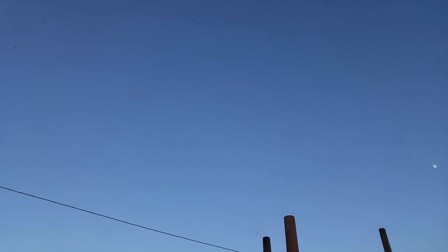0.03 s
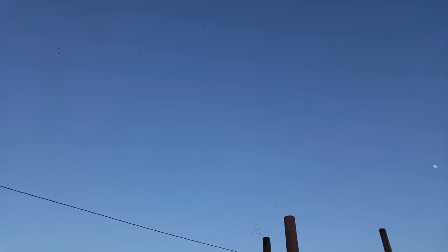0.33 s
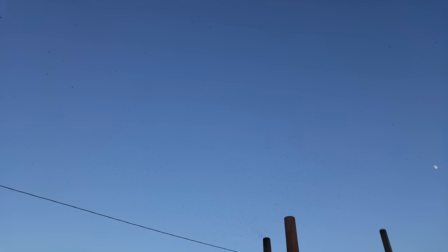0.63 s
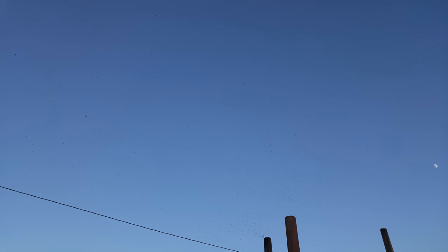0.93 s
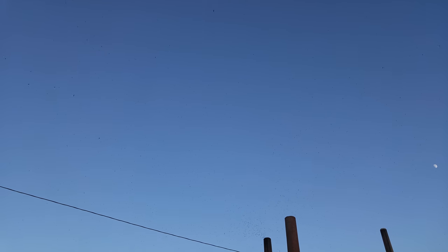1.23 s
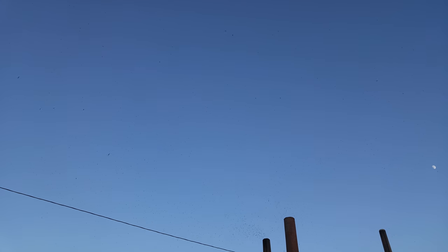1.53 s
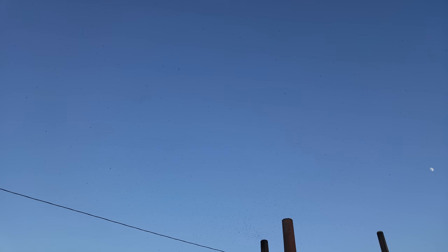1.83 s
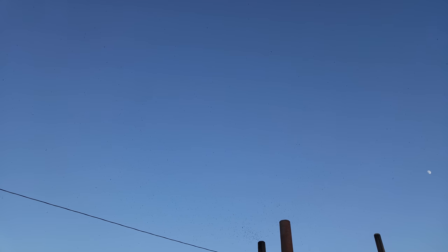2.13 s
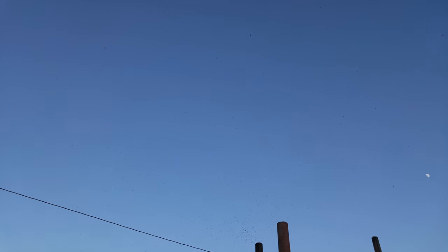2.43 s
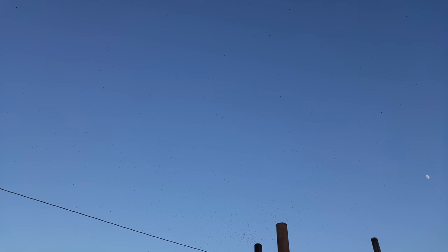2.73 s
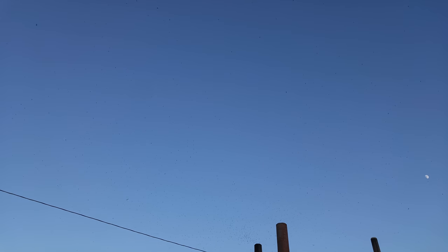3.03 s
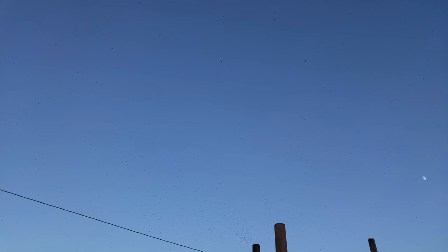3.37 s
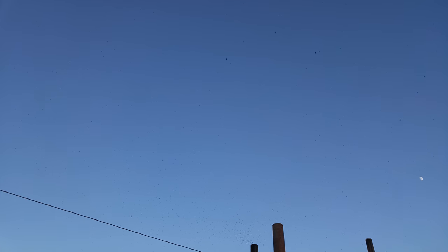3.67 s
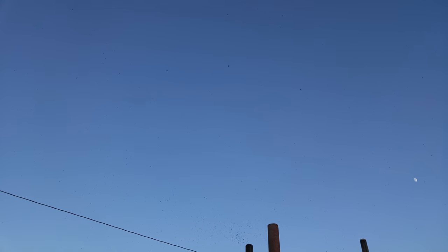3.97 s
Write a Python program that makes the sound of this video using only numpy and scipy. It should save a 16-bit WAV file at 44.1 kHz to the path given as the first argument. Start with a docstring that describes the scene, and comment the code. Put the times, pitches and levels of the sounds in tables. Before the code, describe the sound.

Swifts twitter faintly high overhead throughout the four seconds, with quick falling chirps, short peeps and thin trilled screams around 0.4, 2 and 2.5 seconds. Louder wind buffets the microphone, in long gusts on the left and short puffs on the right, popping at about 2.6 and 3.6 seconds. A far town hum and a faint electric buzz lie behind, dipping with the birds after the last pop.

```python
"""Swifts twitter high overhead: quick falling chirps, short peeps and a few arched, trilled screams,
each a gliding whistle thrown back by a wall and the roofs. Wind buffets the two microphone ports
separately, in long gusts on the left and short puffs on the right, and now and then makes a port pop.
A hand faintly brushes the camera. Behind it all lie the blur of the farthest birds, a far town hum
and a faint, dry electric buzz."""
import sys
import numpy as np
from scipy import signal
from scipy.fft import rfft, irfft, next_fast_len
from scipy.io import wavfile
from scipy.ndimage import uniform_filter1d, minimum_filter1d, map_coordinates

SR = 44100
rng = np.random.default_rng(int(sys.argv[2]) if len(sys.argv) > 2 else 0)


def dump(signal):
    """Clip the signal to [-1, 1] and save it as 16-bit WAV at the path in sys.argv[1]."""
    limited = np.clip(np.atleast_2d(signal).T, -1, 1)
    pcm = np.round(limited * 32767).astype(np.int16)
    wavfile.write(sys.argv[1], SR, pcm)


N = 176400
TIME = np.arange(N) / SR

TRILL_HZ, TRILL_FALL_HZ, ROUGH_HZ, TRILL_ROUGH_HZ = 62.7, 800, 111, 207
def whistle(length, start_hz, middle_hz, end_hz, trill=False):
    """One bird note swells and fades along a bowed glide; a trill chops it into falling pulses."""
    n = max(int(length * SR), SR // 200)
    u = np.linspace(0, 1, n)
    pulse = (TRILL_HZ * np.arange(n) / SR + 0.18 * wobble(22, n)) % 1
    bow = (2 * middle_hz - start_hz - end_hz) * 2 * u * (1 - u)
    hz = start_hz + (end_hz - start_hz) * u + bow
    hz += (TRILL_ROUGH_HZ if trill else ROUGH_HZ) * wobble(900, n)
    swell = np.abs(np.sin(np.pi * u ** 0.78))  # peaks a little early
    if trill:
        hz += TRILL_FALL_HZ * (.5 - pulse)
        swell = np.sqrt(swell) * np.sin(np.pi * pulse) ** 2
    flicker = amp(0.97 * wobble(250, n))
    return unit(swell * flicker * np.sin(2 * np.pi * np.cumsum(hz) / SR))


def chirp(length, start_hz, fall_hz):
    """A plain falling stroke; no two fall or sag quite alike."""
    depth, sag = rng.standard_normal(2)
    fall_hz = fall_hz * (1 + 0.158 * depth)
    sag_hz = 69.3 * (1 + 2 * sag)
    return whistle(length, start_hz, start_hz - fall_hz / 2 - sag_hz, start_hz - fall_hz)


CHIRP_TRIM_DB, CHIRP_FALL_HZ, PEEP_ARCH_HZ = -3, 2193, 350
# falling chirps: t/s, length/s, start f/Hz, level/dB before the trim
CHIRP_CUES = [(.008,.03,8860,-46.5), (0.037,0.042,8670,-51), (.07,.03,7620,-44.5), (0.095,0.035,7950,-44),
              (0.206,0.044,8500,-41.5), (0.241,0.032,8100,-45.5), (0.351,0.016,9000,-48),
              (.488,0.021,8370,-40), (0.559,0.042,8200,-42), (0.694,0.047,8560,-40.5),
              (0.782,0.034,7960,-45), (0.839,0.016,9400,-39.5), (0.857,.02,8070,-44.5),
              (.913,0.021,9120,-42), (.915,0.016,8320,-40), (0.971,0.017,8100,-39), (1.07,0.017,9080,-39.5),
              (1.084,.03,8250,-44), (1.257,0.015,9170,-39.5), (1.36,.035,8030,-49), (1.38,0.015,9030,-44.5),
              (1.497,0.023,9200,-41.5), (1.507,0.013,9200,-39), (1.594,0.013,8900,-41),
              (1.642,.018,8400,-46), (1.664,0.02,9270,-42), (1.757,.018,9600,-47), (1.779,.022,8440,-41),
              (1.786,0.022,9200,-41.5), (1.806,0.033,8760,-48), (1.825,0.016,7570,-45),
              (1.843,.018,9400,-42), (1.898,.022,7900,-41.5), (1.94,0.031,8600,-45.5),
              (2.032,.014,8700,-43), (2.051,0.027,8200,-36.5), (2.161,0.02,8240,-39),
              (2.272,0.041,8100,-34.5), (2.367,0.02,9000,-40), (2.744,0.015,8760,-38.5),
              (2.802,0.058,8000,-45), (3,.04,8170,-45.5), (3.143,.03,8000,-47), (3.187,0.017,9100,-39),
              (3.266,0.018,9100,-39.5), (3.315,0.036,9300,-45), (3.335,.04,7700,-45),
              (3.386,0.015,9100,-48), (3.416,0.024,9000,-45), (3.469,.022,8820,-43), (3.544,0.044,8220,-46),
              (3.812,0.026,8530,-41), (3.937,0.025,8570,-44)]
# arched peeps: t/s, length/s, top f/Hz, level/dB
PEEP_CUES = [(.715,0.017,8300,-41), (.73,0.05,7450,-41), (0.816,0.016,7490,-41), (1.144,0.018,7100,-40),
             (2.979,0.027,8150,-43.5)]
# trilled screams: t/s, length/s, start f/Hz, middle f/Hz, end f/Hz, level/dB
SCREAM_CUES = [(.385, 0.18, 6500, 6600, 7080, -48), (0.489, 0.12, 7750, 8300, 8130, -50.5),
               (1.959, 0.23, 5590, 6520, 6900, -56), (2.089, .16, 6880, 7130, 6160, -50),
               (2.455, 0.22, 5800, 6960, 6250, -44)]
def near_calls():
    """The nearer birds' dry whistles, as (time, level, note)."""
    for s, length, hz, db in CHIRP_CUES:
        yield s, db + CHIRP_TRIM_DB, chirp(length, hz, CHIRP_FALL_HZ)
    for s, length, hz, db in PEEP_CUES:
        yield s, db, whistle(length, hz - PEEP_ARCH_HZ, hz, hz - PEEP_ARCH_HZ)
    for s, length, start, middle, end, db in SCREAM_CUES:
        yield s, db, whistle(length, start, middle, end, trill=True)


FAR_TRILLS_PER_S, FAR_TRILL_DB, FAR_CHIRPS_PER_S, FAR_CHIRP_DB = 4, -56.5, 105, -55
def far_calls():
    """A random scatter of faint, low trills and tiny chirps far off, as (time, level, note)."""
    for s in rng.uniform(0, N / SR, int(FAR_TRILLS_PER_S * N / SR)):
        glide_hz = 6080 * np.exp(0.029 * rng.standard_normal(3))
        yield s, FAR_TRILL_DB, whistle(0.046, *glide_hz, trill=True)
    for _ in range(int(FAR_CHIRPS_PER_S * N / SR)):
        length = 0.02 * np.exp(.3 * rng.standard_normal())
        hz = 7560 + 1200 * rng.uniform(-1, 1)
        fall_hz = min(CHIRP_FALL_HZ, hz - 5647)  # low chirps have less room to fall
        yield rng.uniform(0, N / SR), FAR_CHIRP_DB, chirp(length, hz, fall_hz)


BIRD_PAN_DB, PAN_SPREAD_DB, ARRIVAL_SPREAD_S = -3.5, 4.5, .00004
WALL_DELAY_S, WALL_DB, ECHO_DB, ECHO_T60_S = .0065, -6, -8, 0.12
def swifts():
    """Each call comes from its own direction, doubled by a wall and echoed by the roofs."""
    out = np.zeros((2, N))
    t = TIME[:SR // 3]
    tail = rng.standard_normal((2, len(t))) * amp(-60 * t / ECHO_T60_S)
    for s, db, note in [*near_calls(), *far_calls()]:
        pan, lag, path = rng.standard_normal(3)
        pan_db = BIRD_PAN_DB + PAN_SPREAD_DB * pan
        for delay, loss_db in ((0, 0), (WALL_DELAY_S * np.exp(.3 * path), WALL_DB)):
            add(out, s + delay, amp(db + loss_db) * note, pan_db, ARRIVAL_SPREAD_S * lag)
    echo = signal.fftconvolve(out, tail / np.linalg.norm(tail[0]), axes=1)[:, :N]
    return out + amp(ECHO_DB) * echo


PUFF_EDGE_S = 0.0042
# gusts on the left port: t/s, level/dB
LEFT_GUSTS = [(0, -23.5), (.05, -30), (.19, -22.5), (.39, -13.5), (.635, -25), (.66, -11), (.73, -14),
              (.77, -17), (1.03, -20), (1.07, -13.5), (1.16, -20.5), (1.32, -29), (1.4, -11), (1.56, -31),
              (1.63, -21), (1.94, -14.5), (2.07, -35.5), (2.2, -51), (2.39, -20.5), (2.44, -48),
              (2.55, -24), (2.63, -21), (2.71, -40.5), (2.91, -29), (3.02, -12.5), (3.12, -16),
              (3.38, -14.5), (3.49, -16.5), (3.53, -22.5), (3.6, -18), (3.62, -13), (3.85, -15.5), (4, -16)]
# breeze on the right port between puffs: t/s, level/dB
RIGHT_BREEZE = [(0, -22.5), (.33, -27.5), (.5, -34), (.75, -28), (.87, -25), (1.15, -19), (1.68, -32.5),
                (2.0, -26.5), (2.5, -27), (2.78, -35), (2.97, -22.5), (3.4, -22.5), (3.65, -25.5),
                (4, -28.5)]
# puffs on the right port: middle t/s, length/s, level/dB
RIGHT_PUFFS = [(0.039, 0.021, -15), (0.092, 0.031, -14.5), (0.9, 0.032, -17.5), (1.14, 0.072, -17.5),
               (1.228, 0.028, -14), (1.46, 0.062, -19.5), (1.51, 0.029, -16), (2.046, 0.03, -10),
               (2.142, 0.03, -10.3), (2.236, .04, -16), (2.272, 0.023, -14), (2.405, 0.028, -14),
               (2.579, 0.04, -16.5), (2.627, 0.034, -12.5), (2.674, 0.057, -12), (2.905, 0.037, -12.5),
               (3.231, 0.022, -14), (3.3, 0.018, -14.5), (3.364, 0.042, -16)]
def wind_force():
    """How hard the air hits each port, in dB: long gusts left, soft-edged puffs over a breeze right."""
    right = amp(curve(RIGHT_BREEZE))
    for s, length, db in RIGHT_PUFFS:
        gate = (1 + np.tanh((length / 2 - np.abs(TIME - s)) / PUFF_EDGE_S)) / 2
        right = np.maximum(right, amp(db) * gate)
    return np.array([curve(LEFT_GUSTS), 20 * np.log10(right)])


REFERENCE_DB, FLUTTER_DB, FLUTTER_PER_S = -16.5, 3, 190
# deep rumble of slow eddies: f/Hz, level/dB
RUMBLE_EQ = [(20, -45), (32, -31), (50, 5.5), (72, 10), (110, 6), (180, -4.5), (300, -11), (700, -60),
             (4000, -100)]
# body of the buffeting: f/Hz, level/dB
BUFFET_EQ = [(40, -43), (90, -10), (150, -0.5), (250, -4), (370, -9), (650, -23.5), (1000, -39.5),
             (1600, -58.5), (6000, -100)]
# tearing edge of the hardest gusts: f/Hz, level/dB
TEAR_EQ = [(100, -25), (260, 0), (400, 6.5), (640, 3.5), (850, -8.5), (1100, -20.5), (1500, -33.5),
           (2500, -53.5), (6000, -100)]
# rumble, buffet and tear at the reference force: left level/dB, right level/dB, growth/(dB per dB)
WIND_MIX = [(-19.5, -20.5, .5), (-17.5, -17, 1.0), (-26.5, -23, 2.5)]
# extra fader on the left tear: t/s, level/dB
LEFT_TEAR_FADER = [(.4, -6.5), (.68, -2), (1.08, 0.5), (1.4, -20), (1.95, -13.5), (3.08, 0), (3.55, 4),
                   (3.9, 5), (4, -16)]
def wind():
    """Eddies at the ports make three fluttering noise layers; the harder it blows, the brighter."""
    force_db = wind_force() - REFERENCE_DB
    flutter_db = FLUTTER_DB * np.array([wobble(FLUTTER_PER_S, N) for _ in range(2)])
    layers = []
    for eq, (left_db, right_db, growth) in zip([RUMBLE_EQ, BUFFET_EQ, TEAR_EQ], WIND_MIX):
        drive_db = growth * force_db + np.sqrt(growth) * flutter_db
        layers.append(amp([[left_db], [right_db]]) * amp(drive_db) * noise(eq))
    rumble, buffet, tear = layers
    tear[0] *= amp(curve(LEFT_TEAR_FADER))
    return rumble + buffet + tear


# pop impulses: t/s, level/dB before the EQ, left minus right/dB
POP_CUES = [(2.6296, -1, -27.5), (3.6413, -0.5, 30), (3.6666, -13, 29)]
# midrange knock of a pop: f/Hz, level/dB
POP_EQ = [(100, -10), (700, 5), (1500, 3), (2600, -8), (3500, -25), (4700, -14.5), (5800, -38),
          (15000, -45)]
def pops():
    """Single sharp pushes of air overload one port."""
    out = np.zeros((2, N))
    for s, db, pan_db in POP_CUES:
        add(out, s, amp([db]), pan_db)
    return coloured(out, POP_EQ)


# three brushes and a tick: middle t/s, width/s, level/dB
RUSTLE_CUES = [(1.565, 0.057, -50.5), (2.183, 0.0033, -39), (2.2, 0.12, -52.5), (2.93, 0.1, -52.5)]
# bright hiss of a brush: f/Hz, level/dB
RUSTLE_EQ = [(1500, -6), (4000, -3), (9500, 5), (12500, -14), (15500, -11)]
def rustles():
    """A hand brushes the camera in faint swells of noise."""
    swells = sum(amp(db) * bell(TIME, s, width) for s, width, db in RUSTLE_CUES)
    return swells * noise(RUSTLE_EQ)


FLOCK_DB = -51.5
# treble wash of the flock: f/Hz, level/dB
FLOCK_EQ = [(3500, -46), (5200, -6), (6100, -5), (6900, 1), (7600, -4.5), (8400, -2), (9200, -7.5),
            (10700, -36.5), (12000, -17.5), (13500, -41)]
def flock_blur():
    """The farthest birds merge into a gently wavering hiss."""
    pan = amp([[BIRD_PAN_DB / 2], [-BIRD_PAN_DB / 2]])
    return amp(FLOCK_DB + 0.4 * wobble(8, N)) * pan * noise(FLOCK_EQ)


TOWN_DB = -35
# bed of town and air: f/Hz, level/dB
TOWN_EQ = [(25, -39), (70, -1.5), (250, -6), (650, -10), (1000, -19.5), (1400, -27), (2100, -30),
           (3200, -37), (4800, -34), (10000, -43.5), (13000, -47), (15500, -49)]
def town_hum():
    """The far town blends into low, steady noise."""
    return amp(TOWN_DB) * noise(TOWN_EQ)


MAINS_HZ, TICK_DECAY_S, BUZZ_LEFT_DB, BUZZ_RIGHT_DB = 50, 0.0028, -51.5, -53.5
# thin sizzle of the buzz: f/Hz, level/dB
BUZZ_EQ = [(6000, -31), (7000, 1.5), (8400, 4), (9300, -10), (10400, -20), (13000, -35)]
def electric_buzz():
    """Dry ticks of noise repeat at the mains rate."""
    ticks = np.exp(-(TIME % (1 / MAINS_HZ)) / TICK_DECAY_S) * rng.standard_normal((2, N))
    return amp([[BUZZ_LEFT_DB], [BUZZ_RIGHT_DB]]) * unit(coloured(ticks, BUZZ_EQ))


def amp(db):
    """Decibels to gain."""
    return 10 ** (np.asarray(db) / 20)


def unit(x):
    """Scale to rms 1."""
    return x / np.sqrt(np.mean(x ** 2) + 1e-20)


def bell(x, centre, width):
    """A Gaussian bump of height 1."""
    return np.exp(-((x - centre) / width) ** 2)


def curve(rows):
    """(t/s, value) points as one value per sample."""
    return np.interp(TIME, *np.transpose(rows))


def wobble(rate, size):
    """A smooth random curve, rate knots a second."""
    return map_coordinates(rng.standard_normal(2048), [np.arange(size) * rate / SR], mode="wrap")


def filtered(x, response):
    """Filter x by a gain that depends on frequency."""
    m = next_fast_len(N + SR // 4)
    return irfft(rfft(x, m) * response(np.fft.rfftfreq(m, 1 / SR)), m)[..., :N]


def coloured(x, eq):
    """x through an EQ of (f/Hz, level/dB) points."""
    f, db = np.transpose(eq)
    return filtered(x, lambda hz: amp(np.interp(np.log(hz + 1), np.log(f), db)))


def noise(eq):
    """Coloured noise of rms 1, unrelated in the two channels."""
    return unit(coloured(rng.standard_normal((2, N)), eq))


def add(out, s, sound, pan_db, lag_s=0):
    """Mix a mono sound into the stereo track at time s; the right side comes lag_s later."""
    for track, start, db in zip(out, (s, s + lag_s), (pan_db / 2, -pan_db / 2)):
        i = int(np.clip(round(start * SR), 0, N - 1))
        track[i:i + len(sound)] += amp(db) * sound[:N - i]


# birds, town and buzz dip as the recorder turns down after the loud pop: t/s, level/dB
BACKGROUND_DUCK = [(0, -1.5), (2.95, -2), (3.6, -2), (3.68, -4), (4, -7)]
def scene():
    """Wind and handling at the microphone in front of the far sky, which dips along a drawn curve."""
    close = wind() + pops() + rustles()
    far = flock_blur() + electric_buzz() + town_hum() + swifts()
    return close + amp(curve(BACKGROUND_DUCK)) * far


CEILING, LOW_CUT_HZ, TOP_HZ = .9, 38.3, 15780
# dips in the microphone's response: f/Hz, width/Hz, level/dB
MIC_DIPS = [(489.7, 64.7, -12.5), (7700, 71, -9)]
def record(dry):
    """The microphone cuts two narrow dips; the recorder ducks the highest peaks and limits the band."""
    sound = filtered(dry, lambda hz: amp(sum(db * bell(hz, f, width) for f, width, db in MIC_DIPS)))
    needed = np.minimum(1, CEILING / (np.abs(sound).max(axis=0) + 1e-9))
    gain = uniform_filter1d(minimum_filter1d(needed, size=900), size=900)
    return filtered(gain * sound, lambda hz: (hz < TOP_HZ) * (1 - np.exp(-(hz / LOW_CUT_HZ) ** 4)))


dry = scene()
out = record(dry)
dump(out)
```